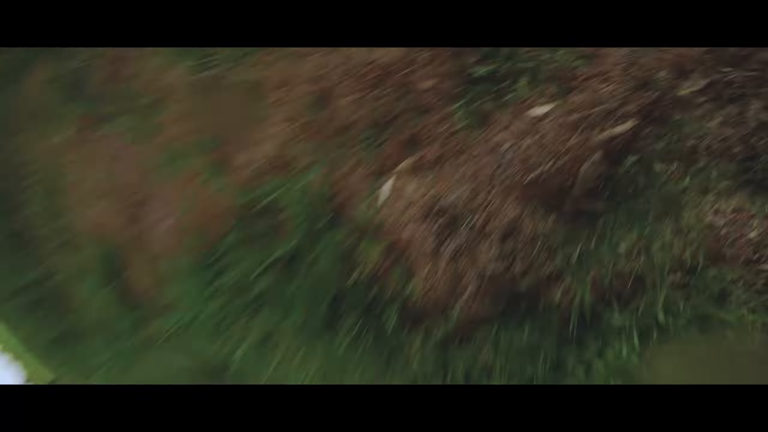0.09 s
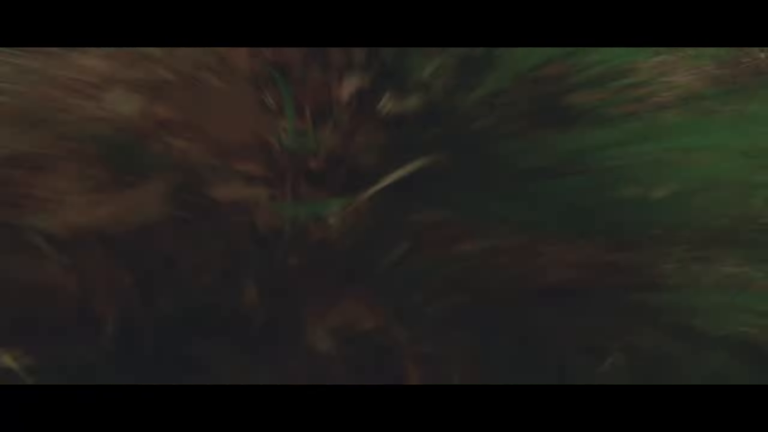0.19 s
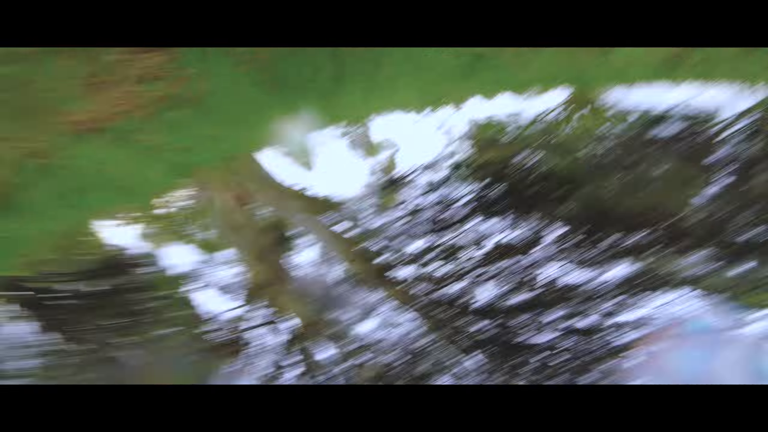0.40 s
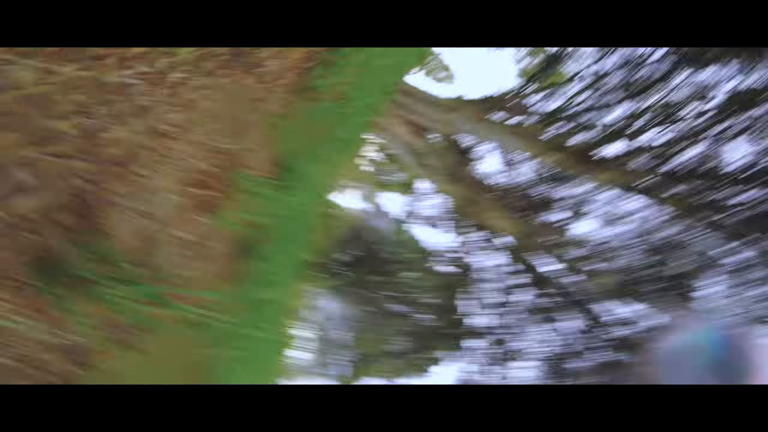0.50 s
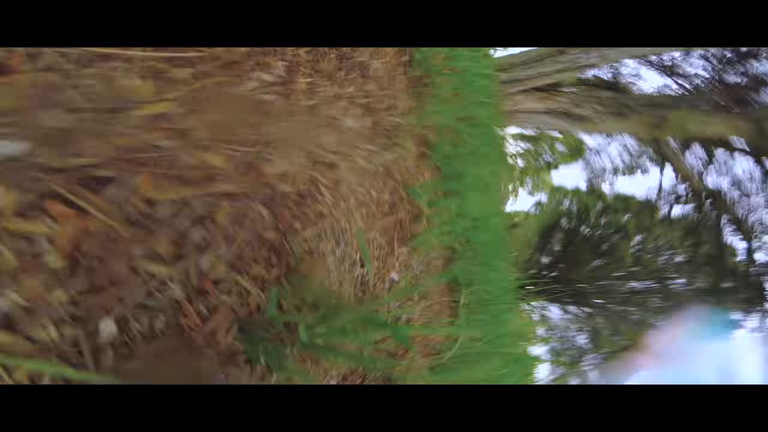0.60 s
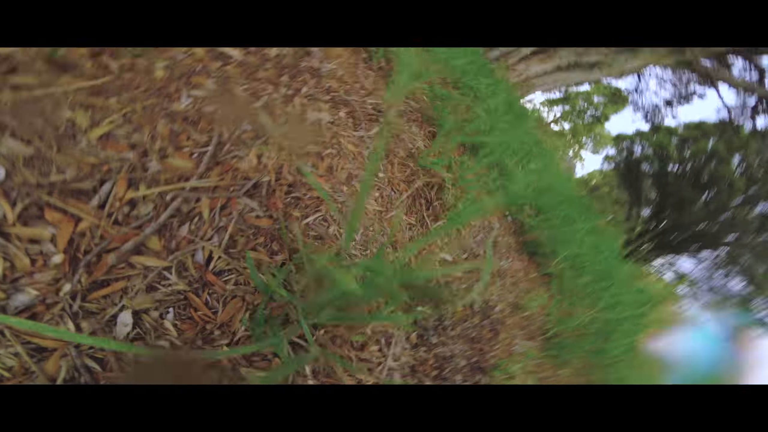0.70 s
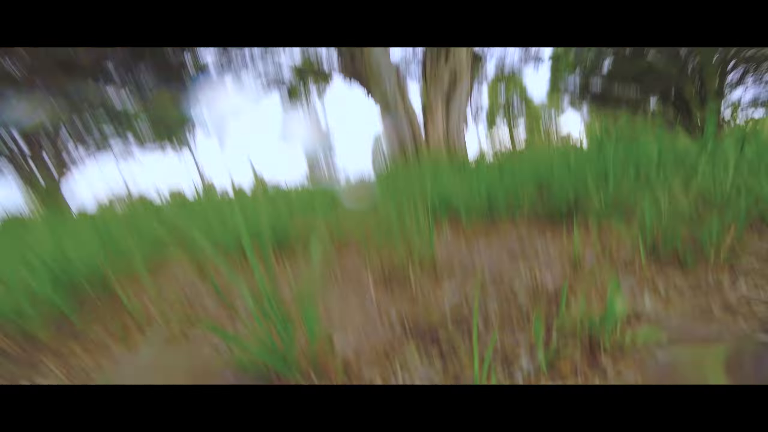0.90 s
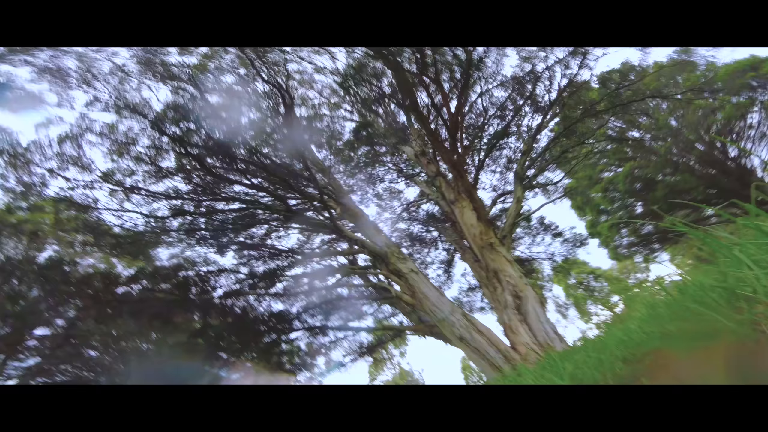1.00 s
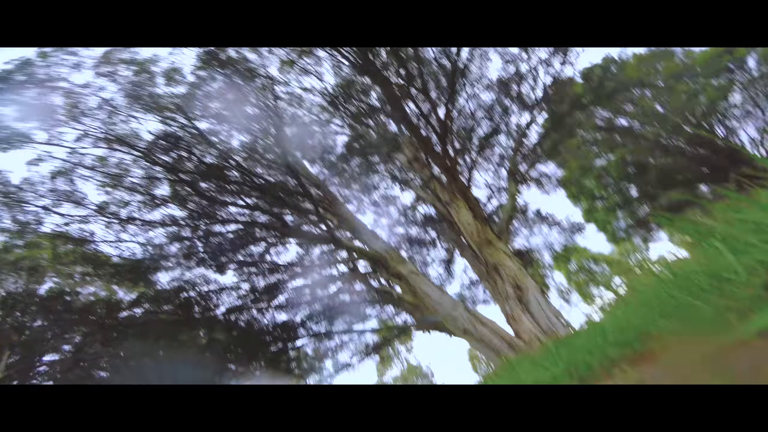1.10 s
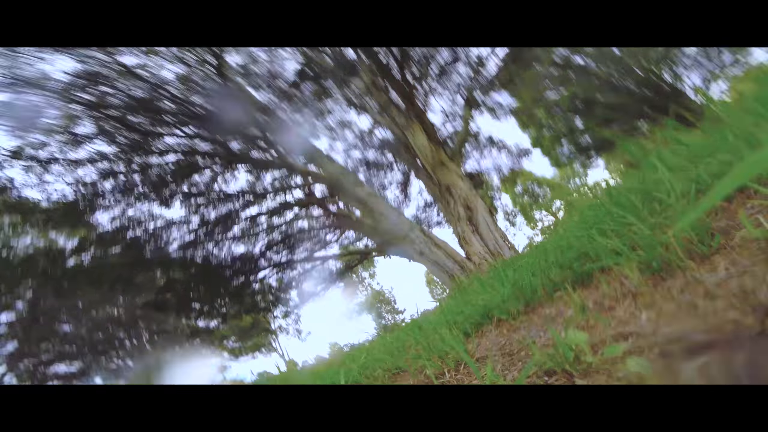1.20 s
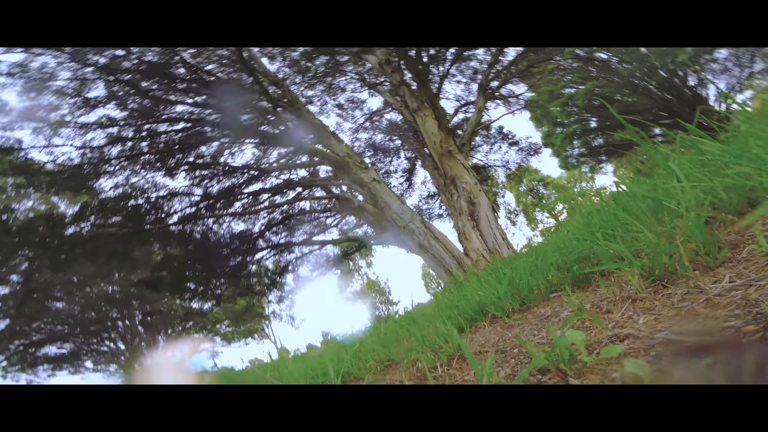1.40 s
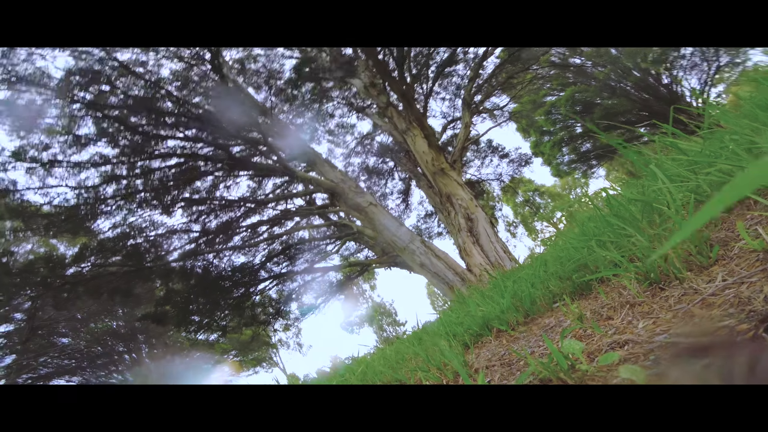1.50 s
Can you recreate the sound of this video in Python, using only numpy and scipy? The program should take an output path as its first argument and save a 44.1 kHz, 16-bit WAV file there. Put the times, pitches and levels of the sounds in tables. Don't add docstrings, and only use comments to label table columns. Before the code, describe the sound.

A small drone crashes and tumbles over leaf litter, thudding and clacking, heard through its camera casing.

```python
import sys
import numpy as np
from scipy import signal
from scipy.fft import rfft, irfft, next_fast_len
from scipy.io import wavfile
from scipy.ndimage import map_coordinates

SR = 44100
rng = np.random.default_rng(int(sys.argv[2]) if len(sys.argv) > 2 else 0)


def voltage_ratio(level):
    return 10 ** (np.asarray(level, float) / 20)


def log_audio(samples):
    frames = np.atleast_2d(samples).T
    limited = np.clip(frames, -1, 1)
    pcm = np.round(limited * 32767).astype(np.int16)
    wavfile.write(sys.argv[1], SR, pcm)


N = 66150

# centre in Hz, width in Hz, level in dB.
FRAME = [(23.4, 28, -13), (147.9, 35.5, -6.5), (73.2, 41, -13.5), (185, 21.6, -9), (233.6, 91, -11.5),
         (318, 45, -18.5), (408.4, 59, -20.5), (570, 86, -15)]


def unit(x):
    return x / np.sqrt(np.mean(x ** 2) + 1e-20)


def along(points, hz):
    f, level_db = np.transpose(points)
    return np.interp(np.log(hz + 1), np.log(f + 1), level_db, left=-120, right=-120)


def wobble(rate):
    knots = rng.standard_normal(int(N * rate / SR) + 4)
    return map_coordinates(knots, [np.arange(N) * rate / SR])


def filtered(x, response):
    size = next_fast_len(N + SR // 2)
    spectrum = rfft(x, size) * response(np.fft.rfftfreq(size, 1 / SR))
    return irfft(spectrum, size)[..., :N]


def body(x, peaks):
    def response(f):
        return sum(voltage_ratio(db) * 1j * f * width / (centre * centre - f * f + 1j * f * width)
                   for centre, width, db in peaks)
    return filtered(x, response)


def dull(x, edge_hz):
    return signal.sosfilt(signal.butter(4, edge_hz, fs=SR, output="sos"), x)


def air():
    # time in s, blade pitch in Hz, blade level in dB, air level in dB.
    flow = [(0, 301, -63.5, -42.5), (0.08, 303, -51, -48.5), (0.161, 326.8, -90, -38.5),
            (0.299, 262.9, -58.5, -42), (0.498, 213, -54.5, -45), (0.699, 196.7, -53, -48),
            (0.822, 185, -58.5, -51.5), (1.001, 172.6, -50.5, -33.5), (1.101, 135.7, -44.5, -39),
            (1.3, 141, -74.5, -44), (1.5, 129.8, -47, -56)]
    # frequency in Hz, density in dB per Hz.
    rumble_curve = [(15, -5.5), (32, 11), (60, 6.5), (100, -3.5), (190, -5), (330, -16.5), (480, -29),
                    (1700, -42.5)]
    # frequency in Hz, density in dB per Hz.
    hiss_curve = [(880, -37), (1500, -25), (1640, -7.5), (2860, -14), (3970, -17.5), (6360, -18.5),
                  (8920, -17.5), (11800, -42.5), (15000, -30.5)]
    gust_db, hiss_db = 3.5, -87.5
    times, *columns = np.transpose(flow)
    hz, blade_db, air_db = [np.interp(np.arange(N) / SR, times, column) for column in columns]
    phase = 2 * np.pi * np.cumsum(hz * (1 + 0.05 * wobble(42))) / SR
    hum = voltage_ratio(blade_db + 5.5 * wobble(32.35)) * np.sqrt(2) * np.sin(phase)
    rumble = unit(filtered(rng.standard_normal(N), lambda f: voltage_ratio(along(rumble_curve, f))))
    hiss = unit(filtered(rng.standard_normal(N), lambda f: voltage_ratio(along(hiss_curve, f))))
    gusts = voltage_ratio(air_db + gust_db * wobble(42.09))
    return hum + gusts * rumble + voltage_ratio(hiss_db + 1.1 * wobble(18)) * hiss


def grains():
    grains_per_s, spread_db, clump_db = 4000, 2.5, 2
    hit = rng.random(N) < grains_per_s / SR
    size_db = spread_db * np.minimum(rng.exponential(size=N), 3) + clump_db * wobble(130)
    return hit * (2 * rng.random(N) - 1) * voltage_ratio(size_db)


def litter():
    # start in s, length in s, level in dB, dry rustle in dB, frame shake in dB
    slides = [(-0.02, 0.32, -80.5, -10, 18.5), (0.187, 0.04, -56.5, 1.5, 24.5),
              (0.643, 0.19, -78, -9.5, 17), (1.31, 0.12, -84.5, -5, 4), (0.209, 0.025, -30.5, -10.5, 18.5),
              (0.22, .055, -60, -21, -11), (0.273, 0.11, -59, -13.5, 15.5), (0.319, 0.038, -59, -11, 15),
              (0.37, 0.11, -76, -16, 14.5), (0.447, 0.08, -65, -21, 15.5), (0.572, 0.042, -53, -15, 14.5),
              (0.611, 0.049, -78.5, -16, 15.5), (0.857, 0.073, -64.5, -12.5, 19.5),
              (0.979, 0.0353, -54.5, -15.5, 24.5), (1.019, 0.029, -74, -7, 1),
              (1.058, 0.11, -65.5, -16.5, 13.5), (1.102, 0.036, -71.5, -5.5, 13.5),
              (1.2, 0.039, -62.5, -11, 25.5), (1.252, 0.03, -72, -5, 24.5), (1.379, 0.11, -76.5, -7, 20),
              (0.798, 0.21, -78, -4, 6), (0.97, 0.032, -64.5, -5.5, 13), (1.14, .12, -70.5, -10, 8.5),
              (0.626, 0.041, -73.5, -15, 21.5)]
    # centre in Hz, width in Hz, level in dB.
    casing = [(1000, 130, -2), (1620, 140, 0), (1320, 160, -7), (2400, 700, -22)]
    # centre in Hz, width in Hz, level in dB.
    wall_band = [(1350, 1100, 0)]
    # centre in Hz, width in Hz, level in dB.
    rustle = [(5395, 2900, 0), (8570, 1300, -15.5), (2850, 1300, -3.5)]
    rise_share, fall_share = 0.3, 0.18
    wall_hz, shake_hz = 1630, 437.5
    t = np.arange(N) / SR
    shapes = []
    for start, length, db, _, _ in slides:
        rise = np.clip((t - start) / (rise_share * length), 0, 1) ** 2
        fall = np.exp(-np.maximum(t - start - length, 0) / (fall_share * length))
        shapes.append(voltage_ratio(db) * rise * fall)
    shapes = np.array(shapes)
    dry_db, shake_db = np.transpose(slides)[3:]
    through_wall = body(body(body(grains(), casing), wall_band), wall_band)
    scrape = unit(dull(through_wall, wall_hz))
    crackle = unit(body(body(grains(), rustle), rustle))
    shake = unit(dull(body(rng.standard_normal(N), FRAME[1:-1]), shake_hz))
    return shapes.sum(0) * scrape + voltage_ratio(dry_db) @ shapes * crackle + voltage_ratio(shake_db) @ shapes * shake


def ticks():
    # time in s, level in dB, pitch in Hz, crack in dB relative to the level.
    contacts = [(.194, -41, 1580, -22), (0.198, -52, 1480, 1), (.213, -27, 1380, 3),
                (0.222, -18.5, 1080, -30), (.225, -7.5, 700, -12), (.229, -12, 1280, -9),
                (0.239, -11.5, 1514, -9.5), (.2415, -15.5, 900, -37.5), (.306, -37, 875, -26.5),
                (.311, -45, 1550, -38), (0.338, -44.5, 1100, -10), (0.376, -40.5, 1205, -15),
                (.422, -63, 1800, 9), (0.474, -50, 1304, -24), (0.508, -43, 1560, -29),
                (.584, -31.5, 1460, -37), (.6036, -34, 1050, -11.5), (0.614, -57, 1560, -22),
                (0.8838, -55, 1580, 5), (.893, -66, 1500, 7), (1.136, -59, 1400, 0), (1.233, -46, 994, -9),
                (0.355, -56, 933, -12), (.914, -45.5, 1310, -13), (0.985, -33.5, 830, -24),
                (.9995, -52, 1560, 7), (1.004, -28, 1574, -11), (1.076, -36.5, 774, -32),
                (1.229, -30.5, 1667, -27.5), (1.316, -45, 820, -43.5), (1.450, -38.5, 783, -32.5),
                (0.598, -43, 1500, -17), (0.867, -50.5, 1220, -20), (0.33, -48, 900, -2),
                (.389, -48, 1620, -35), (.441, -63, 1100, 0.5), (.456, -67, 1400, -30),
                (0.511, -47.5, 1650, -24), (.576, -62, 1500, -2), (0.628, -41.5, 1270, -19),
                (.660, -53, 650, -23.5), (0.674, -60, 750, -31), (.748, -58.5, 1500, -8.5),
                (.979, -53, 1100, -4), (.990, -39.5, 1260, -11.5), (1.030, -46, 900, -33),
                (1.047, -60.5, 1600, -27), (1.109, -56, 1400, 3), (1.2157, -41, 1290, -15),
                (1.270, -52.5, 950, 0.5), (1.3175, -57.5, 900, -42)]
    # centre in Hz, width in Hz, level in dB.
    snap = [(5900, 1800, 0.5), (3000, 1700, 1.5), (9000, 670, -14.5)]
    cycles, crack_s = 2.6, 0.0008
    chatter_s, chatter_db, chatter_hz = 0.004, -5, 1300
    knocks, cracks = np.zeros(N + SR), np.zeros(N + SR)
    t = np.arange(SR // 20) / SR
    noises = rng.standard_normal((len(contacts), len(t)))
    for (start, db, hz, crack_db), noise in zip(contacts, noises):
        at = slice(round(start * SR), round(start * SR) + len(t))
        fade = voltage_ratio(db - 20 * t * hz / cycles) * (1 - np.exp(-t * hz * 3))
        ring = np.sin(2 * np.pi * hz * t) + 0.79 * np.sin(2 * np.pi * hz * 0.65 * t)
        knocks[at] += dull(2 * fade * ring, 1.178 * hz)
        cracks[at] += voltage_ratio(db + crack_db - 1.5) * np.exp(-t / crack_s) * noise
    knocks += voltage_ratio(chatter_db) * dull(np.roll(knocks, round(chatter_s * SR)), chatter_hz)
    return knocks[:N] + body(body(cracks[:N], snap), snap)


def blows():
    # time in s, force in dB, contact in s, direction as a sign.
    impacts = [(0.109, -27.5, 0.0094, -1), (0.199, -20, 0.0069, 1), (.206, -15, 0.0041, -1),
               (0.211, -9.5, 0.0042, -1), (0.218, -2, 0.0025, 1), (0.2217, -1, 0.0034, 1),
               (0.2234, -3.5, 0.0019, -1), (0.227, 2, 0.0042, -1), (0.2331, 0.5, 0.0023, 1),
               (.236, -4.5, 0.0042, 1), (0.2398, -1.5, 0.0022, -1), (0.243, 0, 0.0025, -1),
               (0.245, -1.5, 0.0039, 1), (0.2497, -12, 0.0042, -1), (0.131, -30, 0.014, 1),
               (0.151, -31, .012, -1), (0.982, -23.5, 0.0045, -1), (1.0088, -11.5, 0.0038, -1),
               (1.0138, -14, 0.0047, -1), (1.04, -23.5, 0.0032, 1), (0.333, -16, 0.012, 1),
               (0.349, -47, 0.002, -1), (0.383, -27.5, 0.015, -1), (0.5861, -22, 0.005, 1),
               (0.5907, -16.5, 0.0032, -1), (0.5943, -24, 0.0034, 1), (0.6, -22, 0.0027, 1),
               (0.61, -19.5, 0.0044, 1), (.624, -12.5, 0.0089, -1), (0.887, -31, 0.011, 1),
               (0.914, -25.5, 0.0039, 1), (0.937, -27, 0.0053, 1), (0.989, -12.5, 0.016, 1),
               (1.001, -11.5, 0.0052, -1), (1.037, -38, 0.002, 1), (1.119, -29, 0.01, -1),
               (1.216, -15, 0.008, 1), (1.222, -10, 0.014, -1), (1.273, -23, 0.0036, 1),
               (1.295, -18, 0.017, -1), (1.42, -28, 0.024, -1)]
    # centre in Hz, width in Hz, level in dB.
    sway = (48, 11, 0)
    t = np.arange(N) / SR
    force = np.zeros(N)
    for start, db, contact, way in impacts:
        pulse = np.sin(np.pi * np.clip((t - start) / contact, 0, 1)) ** 2
        force += np.sign(way) * voltage_ratio(db) * pulse
    return 2 * body(force, FRAME + [sway])


def scene():
    return (air() + litter() + ticks() + blows())[None]


def roll_off(x):
    return signal.sosfilt(signal.butter(12, 15570, fs=SR, output="sos"), x)


def record(dry):
    top, knee, port_hz = 0.645, 5, 11000
    bent = dry / (1 + np.abs(dry / top) ** knee) ** (1 / knee)
    return roll_off(dull(bent, port_hz))


dry = scene()
out = record(dry)
log_audio(out)
```